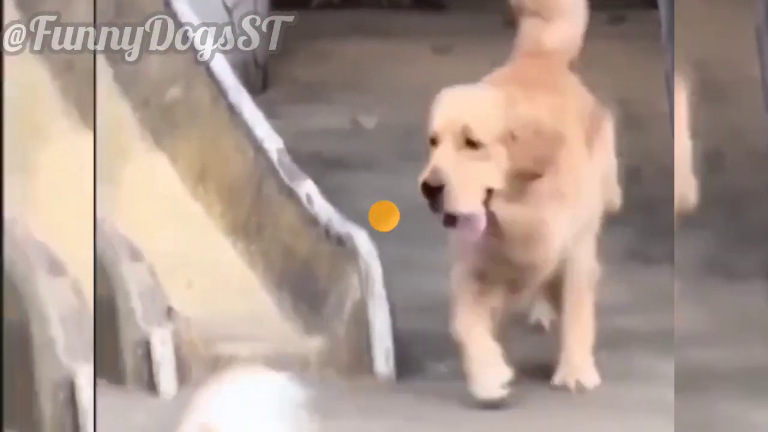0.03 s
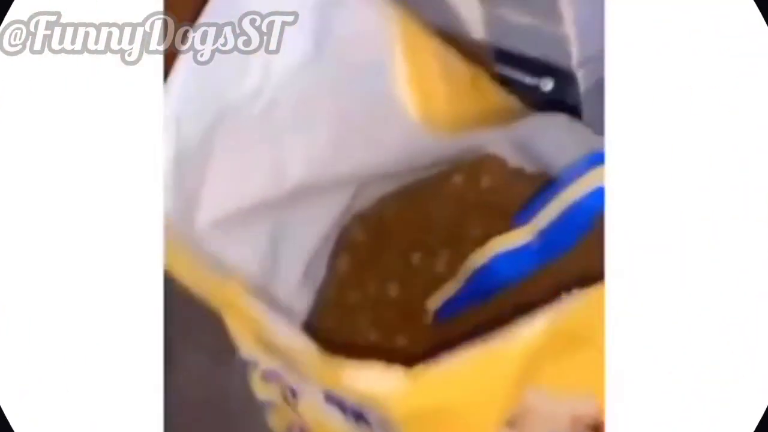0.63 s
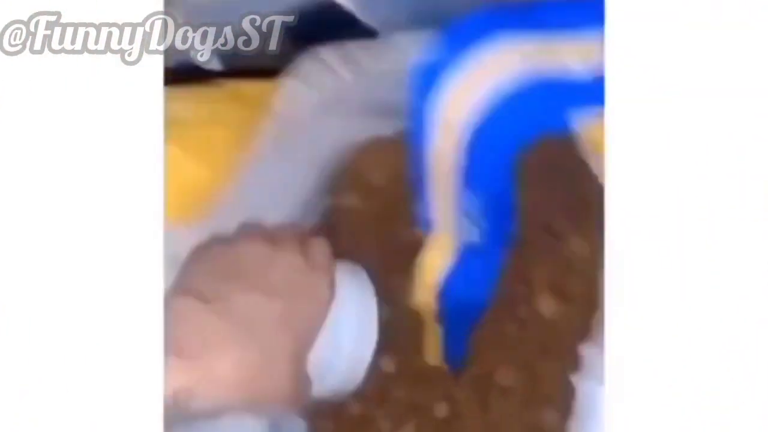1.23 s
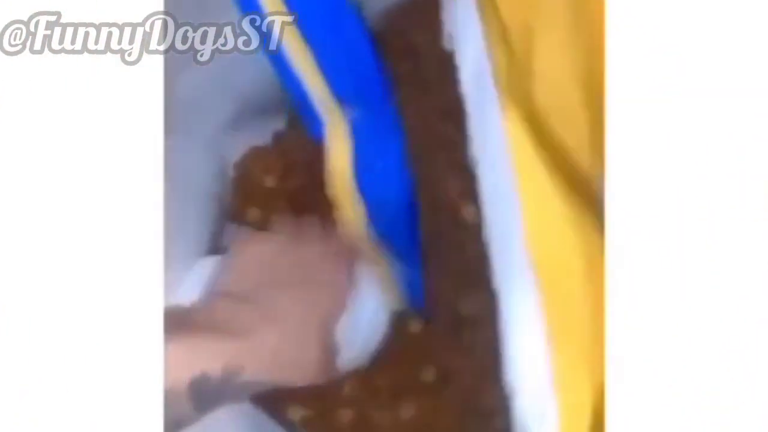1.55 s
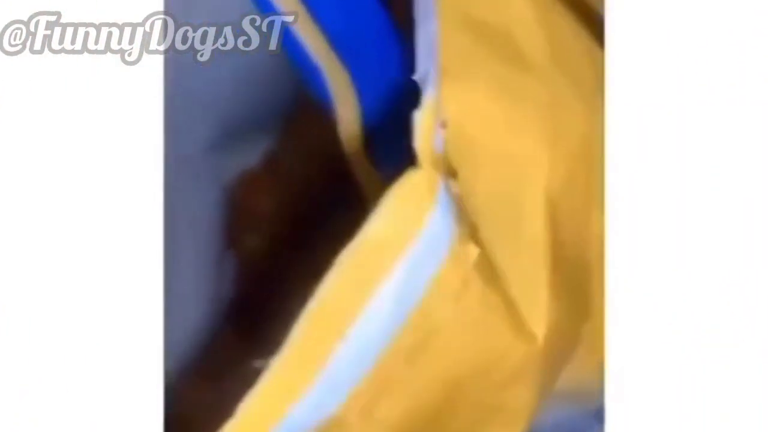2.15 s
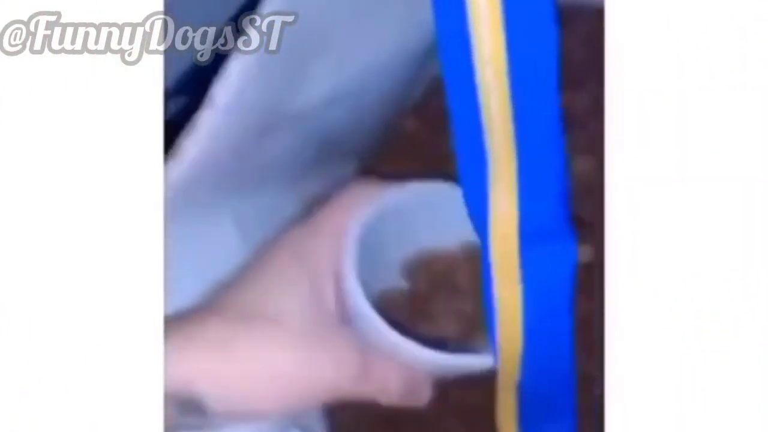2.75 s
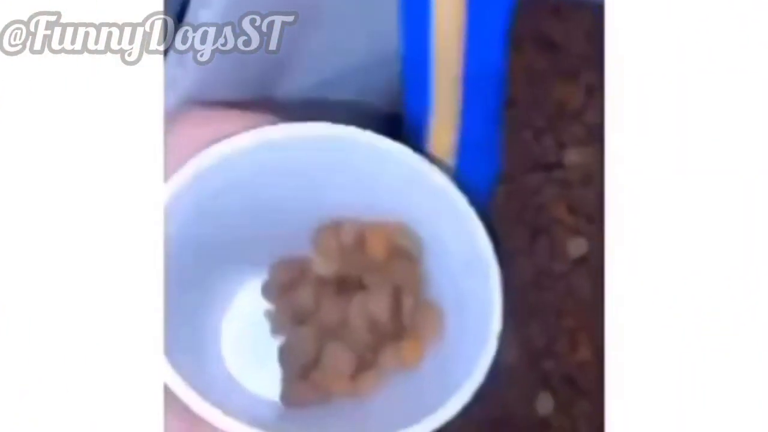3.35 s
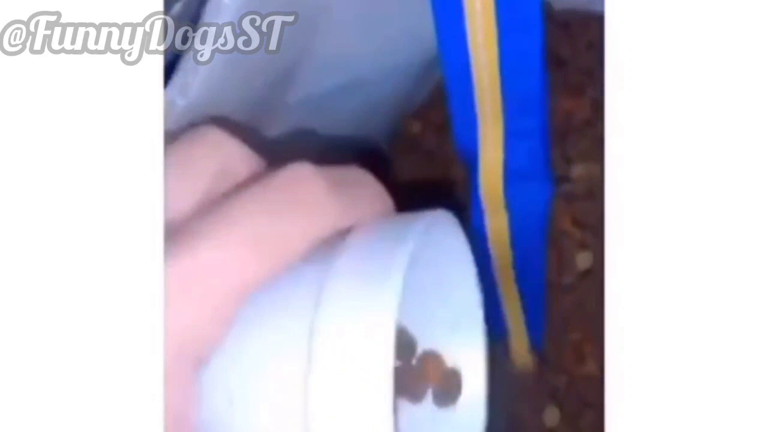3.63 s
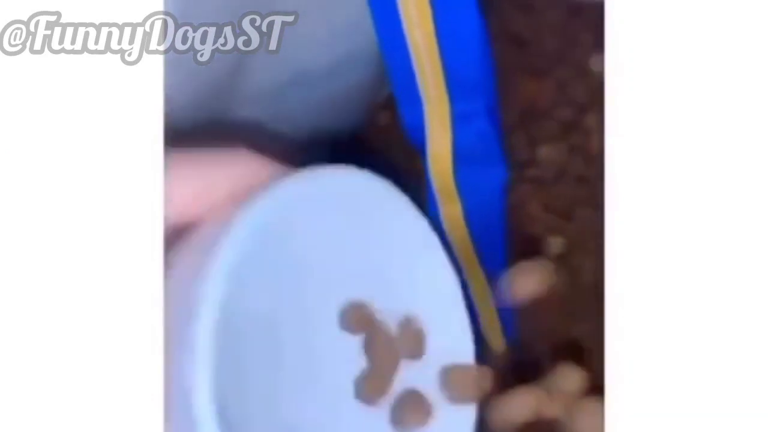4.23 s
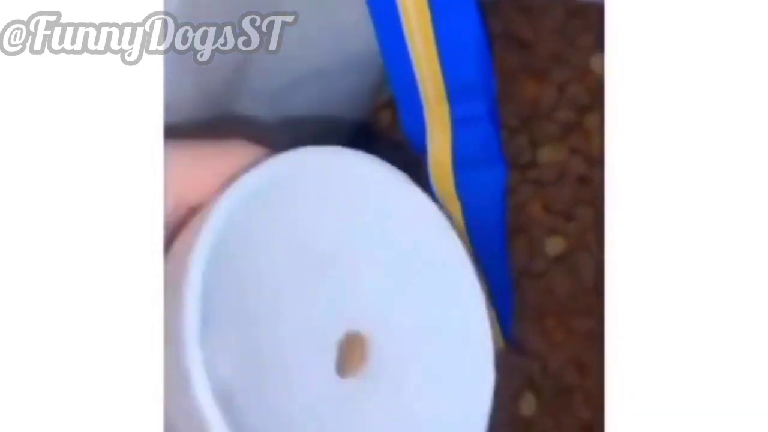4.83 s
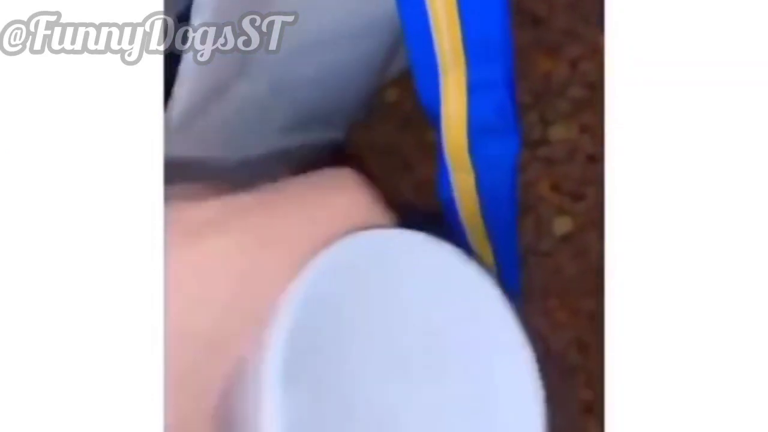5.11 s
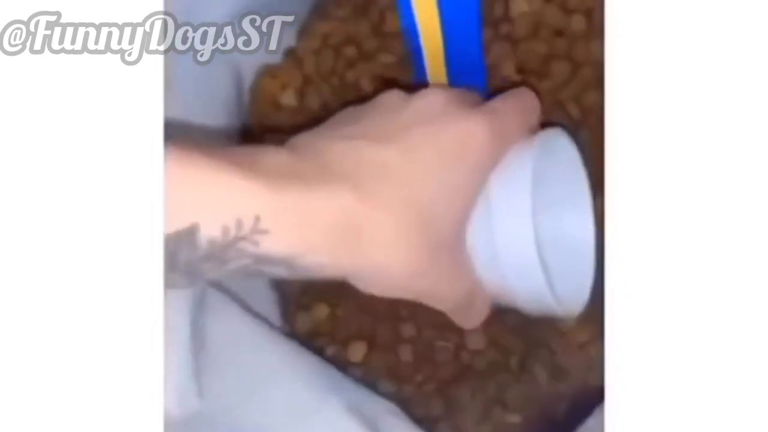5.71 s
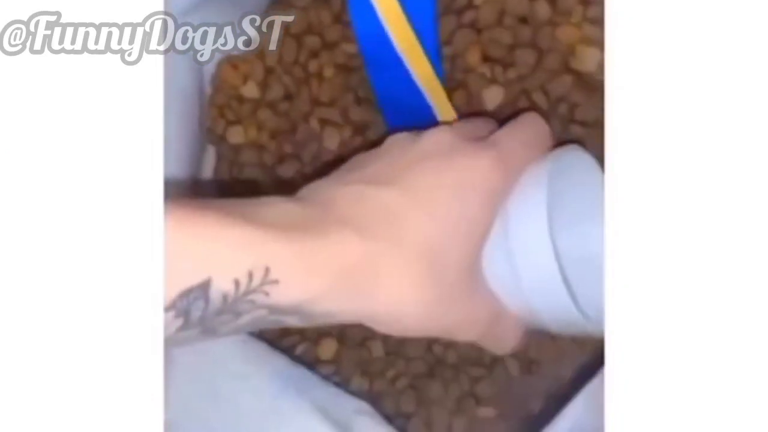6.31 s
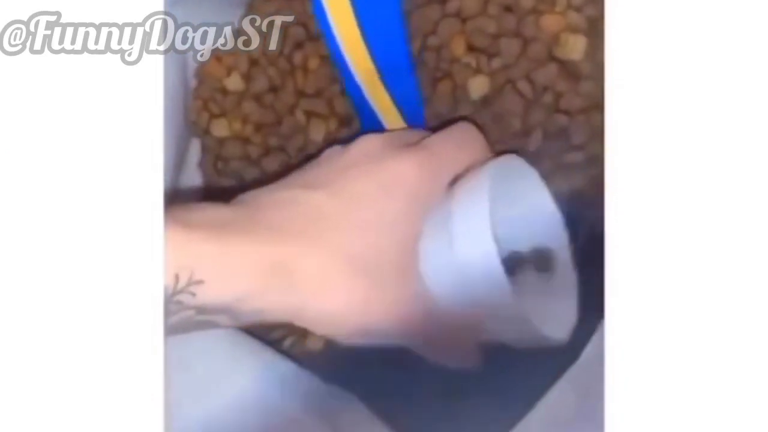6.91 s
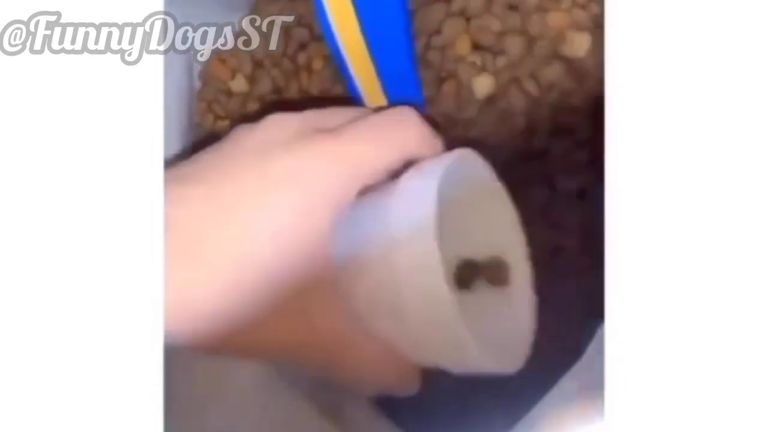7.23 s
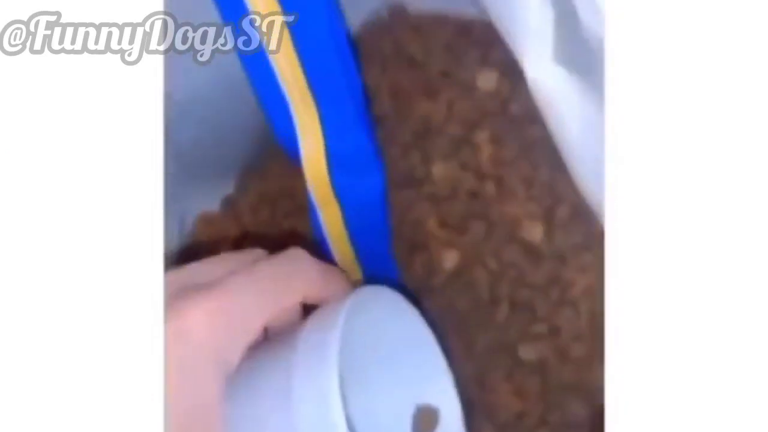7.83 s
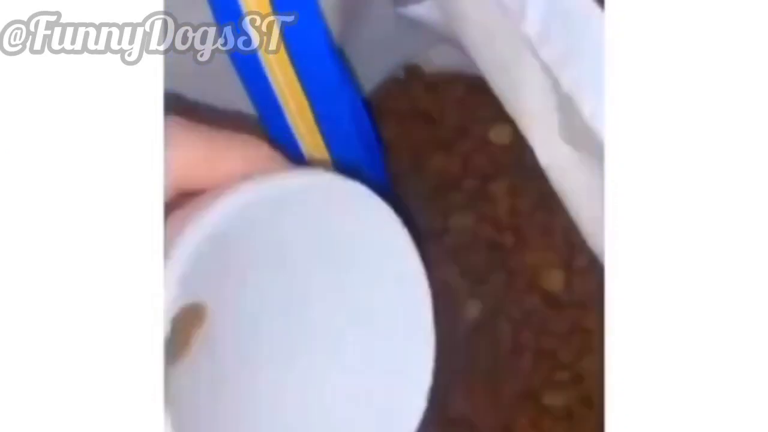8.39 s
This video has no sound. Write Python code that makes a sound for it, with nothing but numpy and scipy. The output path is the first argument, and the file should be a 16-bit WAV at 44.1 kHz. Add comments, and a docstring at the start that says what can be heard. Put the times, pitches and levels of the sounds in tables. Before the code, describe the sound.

A thin plastic cup scoops dry dog kibble from a plastic bag, heard up close over a faint low indoor rumble. After a quiet start, the bag begins to rustle at about 0.6 seconds. From 0.8 to 1.8 seconds pellets crunch loudly in uneven surges while the bag crinkles and snaps. Between 2 and 2.5 seconds the rim rings briefly as it drags through the heap. From about 3.2 seconds the cup is shaken, with loud rattles and single knocks against its wall. Around 4 seconds the pellets pour back. The slack bag flaps softly and the emptied cup gives a few ringing taps until about 5.2 seconds. A quieter second scoop runs from 5.5 to 7.5 seconds, with light crunches, knocks and pops of the bag. From 7.8 to 8.5 seconds loose pellets drop into the cup with quick hollow taps amid more rustling.

```python
"""Close by, a hand digs a thin plastic cup into a bag of dry dog kibble: colliding pellets crunch,
buckling film crinkles and snaps, and bending waves bring the low notes of each blow late.
At 2 s the rim sings through the heap; the cup is shaken, and single pellets knock its wall.
Around 4 s the pellets pour back, the slack bag flaps and the emptied cup rings more freely.
A quieter second scoop follows, and near 8 s loose pellets drop on the floor of the cup."""
import sys
import numpy as np
from scipy import signal
from scipy.fft import rfft, irfft
from scipy.io import wavfile
from scipy.ndimage import uniform_filter1d

SR = 44100
rng = np.random.default_rng(int(sys.argv[2]) if len(sys.argv) > 2 else 0)


def unload_audio(sound):
    """Save the sound as a 16-bit wav file, at the path given as the first command line argument."""
    columns = np.transpose(np.atleast_2d(sound))
    # keep every value between -1 and 1, then stretch to whole-number steps
    steps = np.round(np.clip(columns, -1, 1) * 32767)
    wavfile.write(sys.argv[1], SR, steps.astype(np.int16))


N = 373039
TIME = np.arange(N) / SR
BASS_HZ, MID_HZ, TREBLE_HZ = 283, 884, 3220

# moves of the hand: start t/s, length/s, pellet level/dB, film level/dB, bag level/dB
STROKES = [(0.2, 0.097, -83, -63.5, -77), (0.388, 0.37, -64, -58, -68), (0.657, 0.0077, -40, -44, -28.5),
           (0.811, 0.28, -27, -31, -23), (1.15, 0.15, -26, -41.5, -35), (1.408, 0.081, -26.5, -41, -29.5),
           (1.488, 0.23, -20, -42, -29.5), (1.802, 0.071, -22.5, -35.5, -36.5),
           (2.001, 0.13, -28.5, -44, -40.5), (2.16, 0.44, -26, -36.5, -39.5), (2.555, 0.026, -35, -34, -30),
           (2.672, 0.15, -35.5, -47, -42.5), (3.048, 0.069, -33, -44.5, -34.5),
           (3.165, 0.041, -23, -42, -42), (3.334, 0.38, -31, -35.5, -50), (3.793, 0.31, -36, -41, -30.5),
           (4.148, 0.16, -44.5, -45, -42), (4.679, 0.11, -50, -40, -36.5), (4.903, 0.05, -34.5, -61, -31.5),
           (5.47, 0.4, -36.5, -77, -64), (5.735, 0.24, -33, -54, -65), (6.354, 0.0086, -36, -42.5, -43),
           (6.793, 0.25, -44.5, -65, -47.5), (7.102, 0.26, -42.5, -55.5, -59),
           (7.838, 0.24, -41.5, -40.5, -39.5), (8.241, 0.075, -38, -38.5, -40.5),
           (8.4, 0.06, -28.5, -42.5, -43)]
# resonances of the loaded cup: f/Hz, bandwidth/Hz, gain/dB
LOADED_MODES = [(436, 77, -12), (689, 52, -1), (847, 170, -1.5), (993, 89, -2.5), (1078, 34, -1.5),
                (1770, 33, -3), (1923, 370, -3), (2610, 240, -3.5), (3100, 140, -3.5), (3410, 250, -5.5),
                (4280, 190, -10)]
# resonances of the empty cup: f/Hz, bandwidth/Hz, gain/dB
EMPTY_MODES = [(390, 250, -1), (850, 76, 1), (975, 51, 4.5), (1640, 79, -7), (1865, 72, -12.5),
               (2070, 530, -6.5), (2846, 160, -3.5), (3280, 99, -8), (3610, 160, -5.5), (4300, 210, -20)]
# modes on which the empty cup rings after a strike: f/Hz, bandwidth/Hz, gain/dB
FREE_MODES = [(957, 23, 5.5), (1528, 21, -10), (1822, 17, -5), (3260, 45, 4.5)]


def undb(db):
    """Amplitude ratio of a level in decibels."""
    return 10 ** (np.asarray(db) / 20)


def unit(x):
    """Normalisation to rms 1."""
    return x / np.sqrt(np.mean(x ** 2) + 1e-18)


def blow(x, db):
    """Energy normalisation: spread over 10 ms, the transient would have the level db."""
    return x * undb(db) / np.sqrt(np.sum(x ** 2) / (SR / 100))


def steady(x, span_s):
    """Division by the running rms levels slow swells and keeps the fine grain."""
    power = uniform_filter1d(x ** 2, int(span_s * SR))
    power = uniform_filter1d(power, int(span_s * SR / 2))
    return x / np.sqrt(np.abs(power) + 1e-4 * np.mean(x ** 2))


def add(track, s, sound):
    """Superposition of a sound on a track from time s."""
    start = int(s * SR)
    part = sound[:len(track) - start]
    track[start:start + len(part)] += part


def wander(rate_hz):
    """Random modulation of rms 1: values held for 1 / rate_hz, then smoothed."""
    hold = int(SR / rate_hz)
    steps = np.repeat(rng.standard_normal(N // hold + 1), hold)
    return unit(uniform_filter1d(steps, hold)[:N])


def colour(x, points, size=4096):
    """Minimum-phase filter through points (f/Hz, gain/dB), made causal by folding the cepstrum."""
    hz, db = np.transpose(points)
    f = np.maximum(np.fft.rfftfreq(size, 1 / SR), 1)
    gain = undb(np.interp(np.log(f), np.log(hz), db))
    cepstrum = irfft(np.log(gain))
    cepstrum[1:size // 2] *= 2
    cepstrum[size // 2 + 1:] = 0
    return signal.fftconvolve(x, irfft(np.exp(rfft(cepstrum))))[:len(x)]


def tilt(x, bass_db, treble_db):
    """Spectral tilt: heavier blows have more bass, harder ones more treble."""
    return colour(x, [(BASS_HZ, bass_db), (MID_HZ, 0), (TREBLE_HZ, treble_db)])


def resonate(x, modes):
    """Forced response of parallel resonators (f/Hz, bandwidth/Hz, gain/dB)."""
    return sum(undb(db) * signal.lfilter(*signal.iirpeak(hz, hz / width, fs=SR), x)
               for hz, width, db in modes)


def resonate_twice(x, modes):
    """Resonators in cascade: the response to an impulse swells before it decays."""
    return resonate(resonate(x, modes), modes)


def crack(t60, size=1024):
    """A brittle contact: noise of unit energy that decays by 60 dB in t60 seconds."""
    burst = rng.standard_normal(size) * undb(-60 * np.arange(size) / SR / t60)
    return unit(burst) / np.sqrt(size)


def grains(n, per_s, spread_db, t60, kinds=10):
    """Shot noise: random contacts of several kinds, most small and a few large."""
    out = 0
    for _ in range(kinds):
        strength = undb(spread_db * np.minimum(rng.exponential(size=n), 4))
        ticks = (rng.random(n) < per_s / kinds / SR) * strength
        out = out + signal.fftconvolve(ticks, crack(t60))[:n]
    return unit(out)


def room_tone():
    """Ambient noise: a low indoor rumble, fainter in the first half second."""
    # spectrum of the rumble: f/Hz, gain/dB
    spectrum = [(15, -4), (30, -9), (60, -6.5), (100, -12.5), (200, -22), (1000, -35), (4000, -40),
                (13000, -58)]
    db = np.interp(TIME, [0, .5, .7], [-59, -54, -46])
    return unit(colour(rng.standard_normal(N), spectrum)) * undb(db)


def echoes(x, t60=.072, wet_db=-14, size=16384):
    """Reverberation: reflections from bag and room add a short diffuse tail."""
    rise = 1 - np.exp(-np.arange(size) / SR / .0092)
    tail = colour(crack(t60, size) * rise, [(300, 8.0), (2500, 9.9), (10000, 16.4)])
    return x + undb(wet_db) * signal.fftconvolve(x, tail)[:N]


def stirred(stroke_dbs, rest_db, settle_db_per_s, attack_db_per_s=480, sag_db_per_s=15):
    """Excitation envelope in dB: each stroke builds, loses force, and the material settles."""
    # the hand never rests entirely: t/s, level/dB relative to rest_db
    restlessness = [(0, -39), (0.5, -11), (0.9, -2), (2.95, -0.5), (4.4, -4), (4.65, 7), (5.1, 6.5),
                    (5.3, -4), (6.5, 4), (7.4, 1.5), (7.65, 6.5), (8.46, 8.5)]
    db = rest_db + np.interp(TIME, *np.transpose(restlessness))
    for (start, length, *_), peak_db in zip(STROKES, stroke_dbs):
        t = TIME - start
        attack = attack_db_per_s * np.maximum(-t, 0)
        sag = sag_db_per_s * np.clip(t, 0, length)
        settle = settle_db_per_s * np.maximum(t - length, 0)
        db = np.maximum(db, peak_db - (attack + sag + settle))
    return db


def emptiness(s):
    """Freedom of the cup's wall from the damping of its load at time s, 0-1."""
    # state of the cup: t/s, emptiness/1
    empty = [(4.05, 0), (4.25, 0.93), (7.7, 0.74), (8.3, 0.07)]
    return np.clip(np.interp(s, *np.transpose(empty)), 0, 1)


def bag_dispersion(x, lag_s=.075, corner_hz=115):
    """Dispersion of bending waves in the slack bag: low notes arrive late, scattered by folds."""
    size = 2 * len(x)
    f = np.fft.rfftfreq(size, 1 / SR)
    group_delay = lag_s * rng.uniform(.6, 1.05) / (1 + (f / corner_hz) ** 3)
    folds = 1 + 1.2 * rfft(crack(t60=.12, size=size)) / (1 + (f / 450) ** 2)
    phase = 2 * np.pi * np.cumsum(group_delay) * f[1]
    return irfft(rfft(x, size) * folds * np.exp(-1j * phase))[:len(x)]


def heave(db):
    """Soft impacts of hand and heap on the slack bag excite mainly low frequencies."""
    # spectrum of a soft bump: f/Hz, gain/dB
    spectrum = [(15, -0.5), (35, -6), (60, 4.5), (110, -3), (250, -5.5), (400, -9), (800, -24), (3000, -51)]
    bumps = grains(N, per_s=400, spread_db=2.5, t60=.004)
    return steady(colour(bumps, spectrum), span_s=.06) * undb(db)


def flaps(size=8192, width_hz=40):
    """Damped oscillation: a whole side of the bag swings and comes to rest."""
    # swings of the bag: t/s, level/dB, f/Hz
    swings = [(4.1, -31, 116), (4.746, -27, 66), (4.945, -25.5, 72), (8.155, -24, 74)]
    out, push = np.zeros(N), signal.unit_impulse(size)
    for s, db, hz in swings:
        add(out, s, blow(resonate_twice(push, [(hz, width_hz, 0)]), db))
    return out


def crinkle(db):
    """Small creases tick as they buckle; by coupling, the empty cup lends them its resonances."""
    # spectrum of the ticks: f/Hz, gain/dB
    spectrum = [(100, -6), (500, -6), (1500, 10.5), (3500, 10.5), (6000, 3), (9000, -5), (13000, -17.5)]
    ticks = colour(grains(N, per_s=1100, spread_db=3.5, t60=.035), spectrum)
    empty = emptiness(TIME)
    heard = ticks * (1 - .6 * empty) + resonate(ticks * empty, EMPTY_MODES)
    return steady(heard, span_s=.1) * undb(db)


def film_cracks(size=4096):
    """Sudden release of stress: taut film gives way in one bright crack."""
    # cracks of the film: t/s, level/dB, t60/s, treble/dB
    releases = [(0.9444, -13.5, 0.011, -6.5), (1.004, -25, 0.023, 9), (1.008, -22, 0.022, 21),
                (1.485, -25, 0.0088, 8), (1.5923, -16.5, 0.029, 8.5), (2.581, -25.5, 0.023, 3),
                (7.359, -45, 0.02, 11)]
    # spectrum of a crack: f/Hz, gain/dB
    spectrum = [(150, -7), (1000, 13.5), (2200, 3), (4800, -2), (6500, -11), (13000, -33)]
    out = np.zeros(N)
    for s, db, t60, treble_db in releases:
        burst = colour(crack(t60, size), spectrum)
        add(out, s, blow(tilt(burst, 0, treble_db), db))
    return out


def snaps(size=8192, flutter_db=-4):
    """Snap-through buckling: a crease pops and thumps the bag, and the folds around it flutter."""
    # creases popping over or struck: t/s, level/dB, bass/dB, treble/dB
    creases = [(0.547, -38.5, 18, -8), (0.609, -29, -16, -30), (0.941, -30, 5, -38),
               (1.4797, -17.5, 15, -18), (2.59, -27, 35, -25), (3.256, -27, 38, 5), (3.9945, -23, -12, -34),
               (4.1084, -26.5, -2, -28), (4.3554, -27, 13, -26), (6.7399, -21, 4, -23),
               (6.975, -36, 0, -37), (7.2022, -31, 15, -18), (8.1415, -20, 2, -30)]
    # response of the bag to a pop: f/Hz, gain/dB
    bag_response = [(20, -9), (65, 19), (150, 13), (320, 24), (600, 2.5), (1000, -17.5), (1800, 1),
                    (3500, 3), (6000, -5), (13000, -34)]
    # spectrum of the fluttering folds: f/Hz, gain/dB
    fold_spectrum = [(20, 1), (60, -4.5), (140, -2.5), (260, 0), (700, -15), (1100, -17.5), (3000, -23),
                     (10000, -47)]
    out, t = np.zeros(N), np.arange(size) / SR
    for s, db, bass_db, treble_db in creases:
        burst = colour(crack(t60=.02, size=size), [(250, -18.5), (900, 13.5)])
        pop = signal.unit_impulse(size) + 3 * burst
        folds = grains(size, per_s=500, spread_db=2, t60=.004)
        flutter = colour(folds, fold_spectrum) * np.exp(-t / .028)
        thump = tilt(colour(pop, bag_response), bass_db, treble_db)
        thump = bag_dispersion(thump, lag_s=.055, corner_hz=105)
        add(out, s, blow(blow(thump, 0) + blow(flutter, flutter_db), db))
    return out


def vessel(force, s, bag_direct=.42, cup_direct=.36):
    """Source and filter: pellet contacts at time s sound directly and through the bag or the cup."""
    # spectrum of a pellet contact: f/Hz, gain/dB
    spectrum = [(50, -10), (150, 1), (300, 8), (700, 1), (1500, -1), (2500, -5), (4000, -12.5),
                (9000, -27.5), (13000, -40)]
    # moving kibble that lies in the cup: t/s, share/1
    cup_share = [(0, 0.48), (2.0, 0.47), (2.3, 0.92), (3.7, 0.94), (4.3, 1), (5.1, 0.87), (5.45, 0.58),
                 (6.9, 0.89), (8.3, 1)]
    # cavity resonances of the bag: f/Hz, bandwidth/Hz, gain/dB
    bag_modes = [(284, 19, -11), (553.4, 53, 14), (906, 56, 7.5), (1173, 310, 7.5), (1457, 190, 5.5),
                 (1679, 108, 6), (2030, 130, -4), (2590, 200, -1.5), (3060, 48, -11), (4300, 550, -21)]
    contacts = colour(force, spectrum)
    share = np.clip(np.interp(s, *np.transpose(cup_share)), 0, 1)
    empty = emptiness(s)
    in_bag, in_cup = contacts * (1 - share), contacts * share
    cup = resonate(in_cup * (1 - empty), LOADED_MODES) + resonate(in_cup * empty, EMPTY_MODES)
    return bag_direct * in_bag + resonate(in_bag, bag_modes) + cup_direct * in_cup + cup


def scrapes(size=16384):
    """Sliding friction: cup or hand breaks loose along kibble and film, and the rub dies away."""
    # sudden slips: t/s, level/dB, decay time/s, treble/dB
    slips = [(0.578, -32.5, 0.055, 12.5), (0.627, -32.5, 0.023, 34), (1.924, -25.5, 0.04, -1),
             (2.162, -28, 0.006, -13), (2.212, -16, 0.0055, -7), (3.152, -22, 0.013, 5),
             (3.317, -25.5, 0.095, 12.5), (4.458, -43.5, 0.07, 11), (4.671, -26.5, 0.021, 12.5),
             (5.449, -32.5, 0.015, 2), (7.038, -36, 0.029, -1), (8.229, -30.5, 0.031, 14)]
    out, t = np.zeros(N), np.arange(size) / SR
    for s, db, fade_s, treble_db in slips:
        force = steady(grains(size, per_s=5000, spread_db=-1, t60=.0043), span_s=.074)
        rub = unit(tilt(vessel(force, s), .57, treble_db))
        add(out, s, rub * undb(db) * np.exp(-t / fade_s))
    return out


def landings(size=2048, bounce_db=-9):
    """Impact of small hard bodies: pellet on pellet gives a high tick and one bounce."""
    # poured pellets landing on the heap: t/s, level/dB
    impacts = [(3.601, -38.5), (3.697, -39.5), (3.924, -40), (4.142, -47), (4.246, -45.5)]
    out = np.zeros(N)
    for s, db in impacts:
        tick = resonate_twice(crack(t60=.028, size=size), [(6000, 6000, 0)])
        add(out, s, blow(tick, db))
        add(out, s + rng.uniform(.003, .012), blow(tick, db + bounce_db))
    return out


def cup_dispersion(x, lag_s=.0018, corner_hz=1400):
    """Dispersion in the thin wall: high notes outrun low ones, so a strike swells for a moment."""
    f = np.fft.rfftfreq(len(x), 1 / SR)
    group_delay = lag_s / (1 + (f / corner_hz) ** 2)
    phase = 2 * np.pi * np.cumsum(group_delay) * f[1]
    return irfft(rfft(x) * np.exp(-1j * phase), len(x))


def ring_out(modes, width_scale, size, db_per_octave=-7):
    """Free decay of the cup's modes; each strike has its own mix, and the grip detunes it slightly."""
    t, out = np.arange(size) / SR, 0
    for (hz, width, db), (mix, grip) in zip(modes, rng.standard_normal((len(modes), 2))):
        note = np.sin(2 * np.pi * hz * (1 + .008 * grip) * t)
        gain = undb(db + 2.5 * mix + db_per_octave * np.log2(hz / MID_HZ))
        out = out + note * gain * np.exp(-np.pi * width * width_scale * t)
    return out


def pings(size=16384):
    """Cavity resonance: a pellet on the cup's floor sounds its hollow, then the free modes ring on."""
    # loose pellets dropping: t/s, level/dB, bass/dB, treble/dB, ring/dB
    drops = [(4.853, -25.5, 0, 13, -18), (5.0553, -28.5, 6, 17, 11), (5.149, -33.5, 11, 1, -2),
             (7.794, -29.5, -4, 6, -16), (8.028, -22.5, 1.5, -2, -22), (8.1, -23, 3, -7, -29),
             (8.156, -30, -20, -4, -6), (8.277, -28, 19, 21, -20), (8.309, -22, 5, 7, -5),
             (8.338, -19, -14, -16, -10), (8.392, -23.5, -6, 1, -6), (8.398, -21.5, 14, 9, -20),
             (8.433, -24, 1, 0, -10)]
    # response of the hollow, driven from the floor: f/Hz, gain/dB
    cavity_response = [(100, -14.5), (350, 0.5), (650, 4.5), (960, 5.5), (1130, -15), (1350, -25),
                       (1800, 0.5), (2200, -20), (2700, -16), (13000, -52)]
    out, hollow = np.zeros(N), colour(signal.unit_impulse(size), cavity_response)
    for s, db, bass_db, treble_db, ring_db in drops:
        pock = blow(tilt(hollow, bass_db, treble_db), 0)
        ring = blow(ring_out(FREE_MODES, width_scale=.95, size=size), ring_db)
        add(out, s, blow(cup_dispersion(pock + ring, lag_s=.003, corner_hz=1100), db))
    return out


def knocks(size=16384, tick_db=-6, thud_db=-10):
    """Impulse response of the held cup: the wall swings, the pellet ticks, the hand thuds, modes ring."""
    # single pellets striking the wall: t/s, level/dB, wall f/Hz, bass/dB, treble/dB, ring/dB
    strikes = [(0.892, -16, 1470, 8, 11, -15), (1.1973, -15.5, 1420, 5.5, 0, -4),
               (1.981, -27, 1940, -8, -2, -4), (2.123, -30.5, 1430, -12, 9, -7),
               (2.348, -15.5, 890, -9, -9, 11), (2.355, -37, 780, 3, -8, -6), (2.441, -20, 700, -4, -1, 3),
               (2.643, -31.5, 740, -1, 4, -34), (2.776, -26, 637, -7, -2.5, -30),
               (3.231, -25, 716, -1, 1, -15), (3.3425, -17.5, 1090, 1, 2, -13),
               (3.4537, -13.5, 955, -10, 2, -4), (3.4796, -14.5, 910, -15, -7, -6),
               (3.571, -21.5, 950, -6, -15, -13), (3.6498, -14, 970, 9, -8, -19),
               (3.754, -15.5, 910, 9, 5, -11), (3.768, -13.5, 1570, 3, 3, -4),
               (3.8502, -18.5, 800, 7, -5, -12), (3.8665, -15.5, 755, 5, -5, -13),
               (3.969, -20.5, 850, 10, 7, -6), (4.158, -31, 835, 4, 15, -3),
               (4.287, -34, 2040, 15.5, -3, -8), (4.648, -37, 1500, 6, 24, 7),
               (4.731, -30.5, 1480, -1, -6, -12), (4.901, -23, 1050, 7, 3, -9),
               (5.332, -36.5, 845, 22, -5, -22), (5.5742, -31.5, 1270, -7, 1, -16),
               (6.146, -24, 1130, 8, -6, -4.5), (6.231, -32, 473, 12, 12, -9),
               (6.2873, -27, 1070, 14, 4, -5), (6.7401, -25, 1380, 0, 7, -17),
               (7.919, -28.5, 2080, -1, 16, -8), (7.951, -36, 2170, -1, 4, -14),
               (8.002, -33, 2020, -1, -3, -10)]
    out, push = np.zeros(N), signal.unit_impulse(size)
    lowpass = signal.butter(2, 5800, fs=SR)
    thud = blow(resonate(push, [(338, 72, 0)]), thud_db)
    for s, db, hz, bass_db, treble_db, ring_db in strikes:
        swing = blow(resonate_twice(push, [(hz, 400, 0)]), 0)
        contact = vessel(crack(t60=.029, size=size), s)
        tick = blow(signal.lfilter(*lowpass, contact), tick_db)
        # in free decay the loaded cup's modes are about half as wide
        modes, width_scale = (FREE_MODES, 1) if emptiness(s) > .5 else (LOADED_MODES, .52)
        ring = blow(ring_out(modes, width_scale, size), ring_db)
        knock = tilt(swing + tick + ring + thud, bass_db, treble_db)
        add(out, s, blow(cup_dispersion(knock), db))
    return out


def rattle(per_s, spread_db, q, sizes):
    """Random impacts on pellets of many sizes, each size a damped resonator with its own note."""
    out = 0
    for hz in np.geomspace(200, 12000, sizes):
        strength = undb(spread_db * np.minimum(rng.exponential(size=N), 4))
        hits = (rng.random(N) < per_s / SR) * strength * rng.choice([-1, 1], N)
        out = out + resonate_twice(unit(hits), [(hz, hz / q, 0)])
    return unit(out)


def sliding(db, crack_db=-13):
    """Granular friction: pellets grind past each other in lurches and set the dragged rim singing."""
    # resonances of the rim: f/Hz, bandwidth/Hz, gain per pass/dB
    rim_modes = [(956, 70, 4), (4900, 120, -6.5)]
    # the rim dragged through the heap: t/s, level/dB relative to the sliding pellets
    rim_drag = [(1.9, -33), (2.0, 0.5), (2.2, -17), (2.3, 1.5), (2.4, -6), (2.55, -38)]
    per_s = 240 * undb((db + 25) / 7)  # gentle stirring moves fewer pellets
    churn = steady(rattle(per_s, spread_db=3.6, q=9, sizes=36), span_s=.05)
    cracks = steady(grains(N, per_s=1200, spread_db=2, t60=.008), span_s=.08)
    lurches = unit(undb(1.7 * wander(45) + 1.2 * wander(16)))
    force = (churn + undb(crack_db) * cracks) * lurches
    rim_db = db + np.interp(TIME, *np.transpose(rim_drag))
    rim = unit(resonate_twice(force, rim_modes)) * undb(rim_db)
    return vessel(force * undb(db), TIME) / np.std(vessel(force, TIME)) + rim


def clatters(size=12000, margin_s=.05, front_db=-3.5):
    """Many collisions merge in a Gaussian surge; the front of a thrown load lands as an earlier beat."""
    # loads shifting or landing: centre t/s, level/dB, spread/s, bass/dB, treble/dB, lead of the front/s
    loads = [(0.655, -22.5, 0.0015, 16, 20, 0.0061), (0.841, -12.5, 0.0037, 10, 10, 0.0038),
             (0.8782, -18.5, 0.00048, -26, -10, 0), (0.972, -19.5, 0.0087, -8, 19, 0),
             (1.0078, -15.5, 0.013, 1.5, 12, 0), (1.0434, -15, 0.0087, 7, 8, 0),
             (1.208, -7.5, 0.0069, 3.5, 12, 0.019), (1.384, -17, 0.006, -1, 0, 0.0069),
             (1.513, -14, 0.0053, 6.5, 6, 0.007), (1.577, -14, 0.0044, -2, 5, 0.0037),
             (1.5445, -11.5, 0.0072, -1, -1, 0.0078), (1.817, -14.5, 0.012, -17, -11, 0),
             (2.271, -21.5, 0.0041, -28, -15, 0.0019), (2.354, -14.5, 0.0078, -12, -14, 0),
             (2.579, -18.5, 0.0035, 14.5, 10, 0.0058), (3.3494, -15.5, 0.0081, -12.5, -5.5, 0.0049),
             (3.445, -14, 0.0069, -5.5, -3, 0), (3.5418, -16.5, 0.0087, -6, -1.5, 0),
             (3.654, -10, 0.0093, -10, 0, 0.0096), (3.774, -9.5, 0.0076, -2, 2.5, 0.011),
             (3.872, -12.5, 0.0081, -1, 0, 0.021), (3.971, -15.5, 0.002, 6, 4.5, 0.0149),
             (4.077, -15.5, 0.0033, 4.5, 3.5, 0.0034), (4.922, -16.5, 0.0042, -1, 1, 0.022),
             (5.805, -21, 0.0072, -11, -7, 0.026), (6.06, -28, 0.012, -8.5, -4, 0),
             (6.3071, -27, 0.0025, -0.5, 1.5, 0.014), (7.128, -38, 0.018, -6, 20, 0.011),
             (7.147, -31, 0.0021, -5.5, -7, 0.0051), (7.509, -34.5, 0.01, 4.5, 4, 0)]
    out, t = np.zeros(N), np.arange(size) / SR - margin_s
    for s, db, spread_s, bass_db, treble_db, lead_s in loads:
        surge = np.exp(-.5 * (t / spread_s) ** 2)
        if lead_s > spread_s:
            surge += undb(front_db) * np.exp(-.5 * ((t + lead_s) / spread_s) ** 2)
        force = grains(size, per_s=1500, spread_db=1.8, t60=.005) * surge
        crunch = tilt(vessel(force, s), bass_db, treble_db)
        add(out, s - margin_s, blow(bag_dispersion(crunch), db))
    return out


def scene():
    """Superposition at one point of continuous handling, single blows, reflections and room noise."""
    _, _, pellets_db, film_db, bag_db = np.transpose(STROKES)
    handling = (sliding(stirred(pellets_db, rest_db=-51.5, settle_db_per_s=165))
                + crinkle(stirred(film_db, rest_db=-60.5, settle_db_per_s=232))
                + heave(stirred(bag_db, rest_db=-61, settle_db_per_s=150)))
    blows = clatters() + knocks() + pings() + snaps() + flaps() + film_cracks() + scrapes() + landings()
    return np.tile(echoes(handling + blows) + room_tone(), (2, 1))


def record(dry):
    """Mid-side stereo: the treble flickers between the channels; peaks are clipped, the top is cut."""
    side_db, side_above_hz, top_hz = -6.5, 3900, 13300
    highpass = signal.butter(12, side_above_hz, "high", fs=SR, output="sos")
    lowpass = signal.ellip(8, .1, 50, top_hz, fs=SR, output="sos")
    side = undb(side_db) * signal.sosfilt(highpass, dry[0] * wander(300))
    stereo = np.clip(dry + np.array([side, -side]), -.85, .85)
    return signal.sosfiltfilt(lowpass, stereo)


dry = scene()
out = record(dry)
unload_audio(out)
```